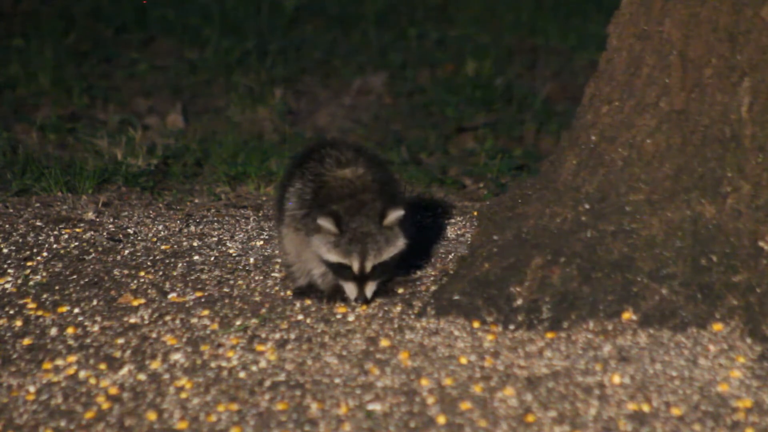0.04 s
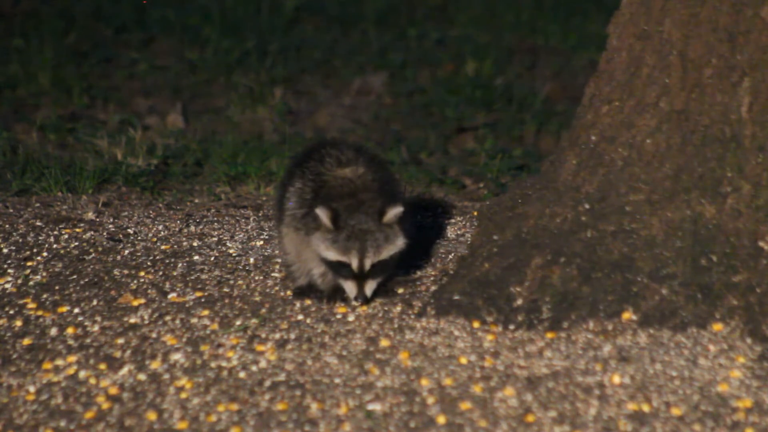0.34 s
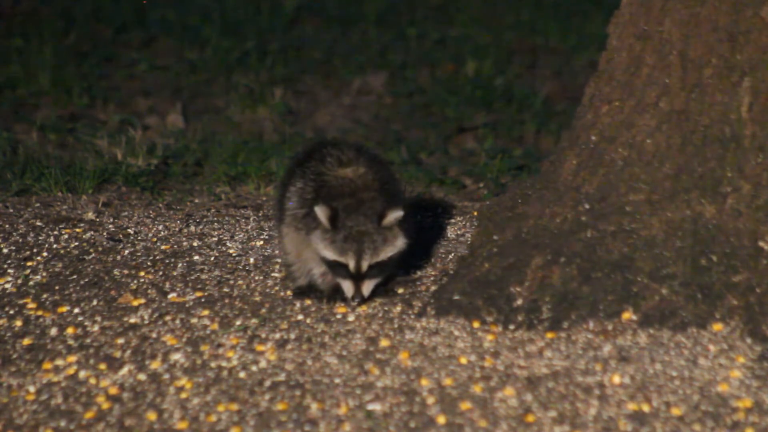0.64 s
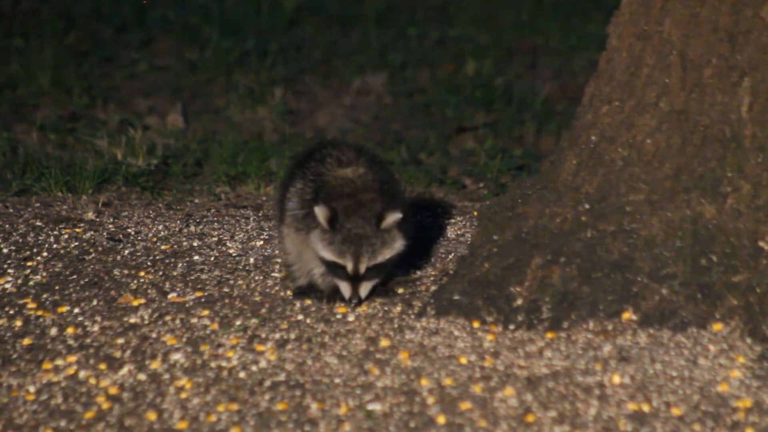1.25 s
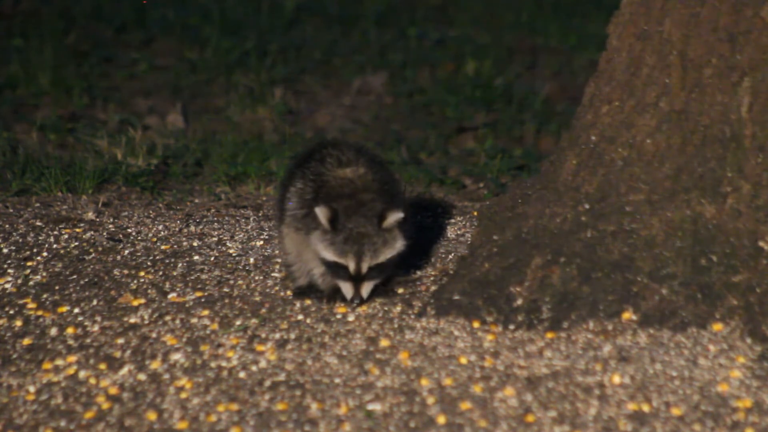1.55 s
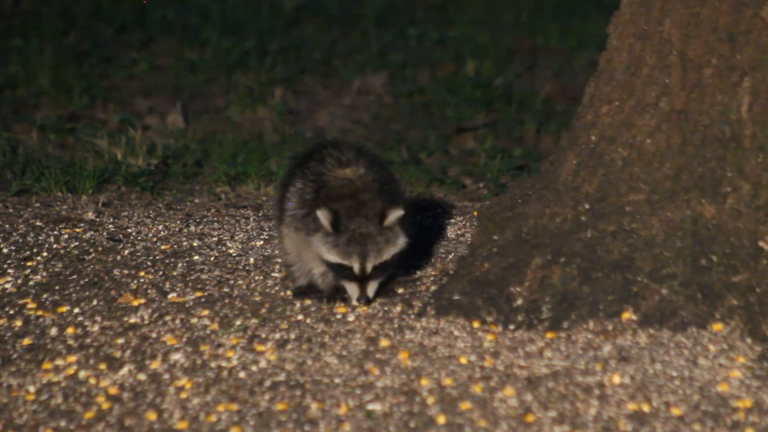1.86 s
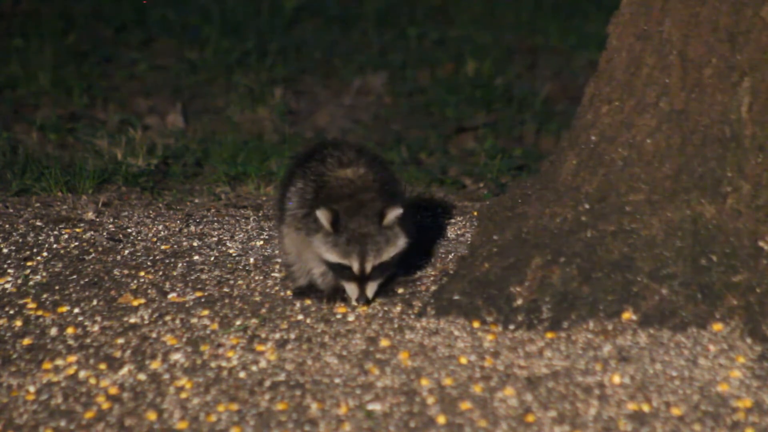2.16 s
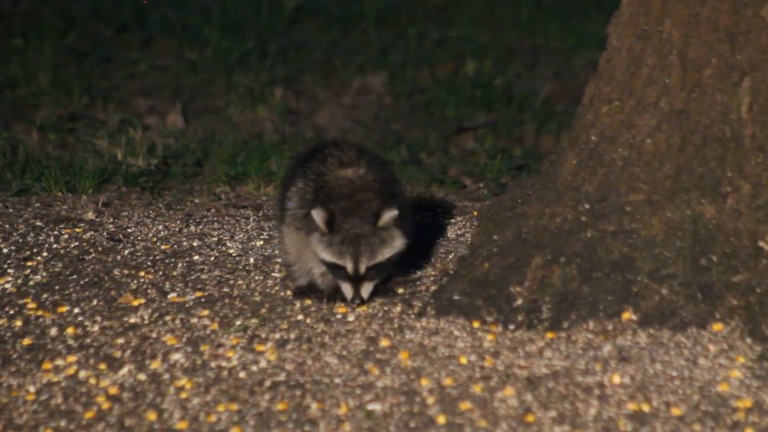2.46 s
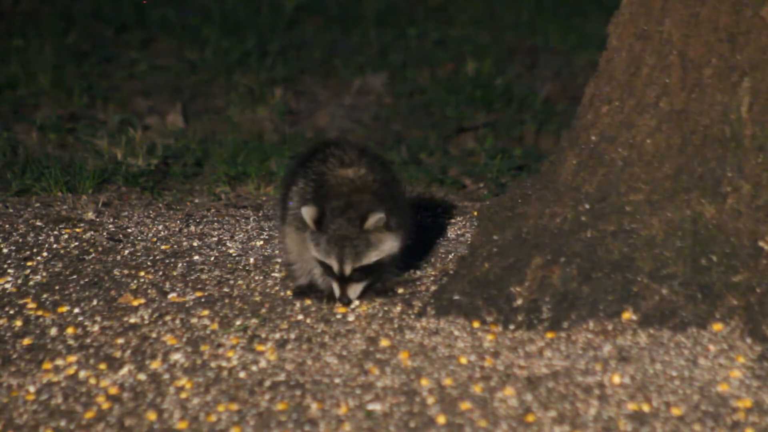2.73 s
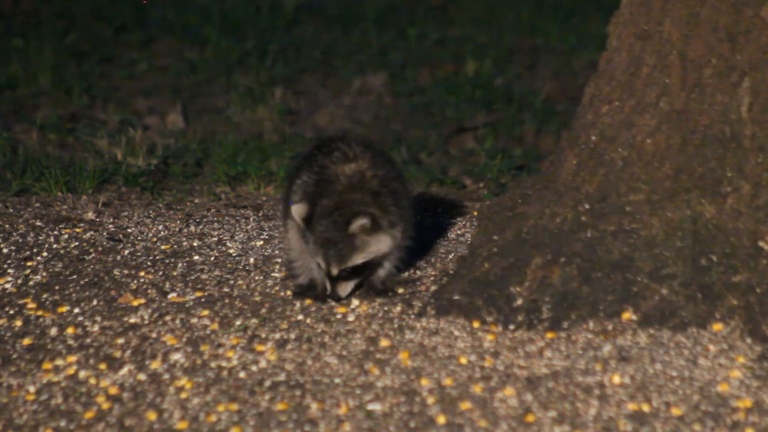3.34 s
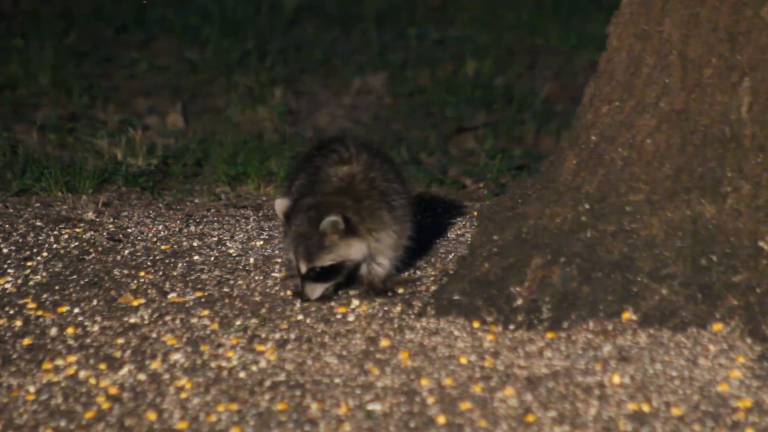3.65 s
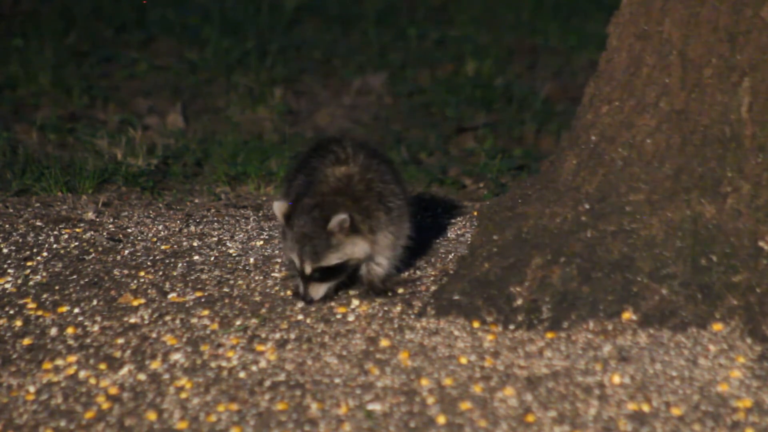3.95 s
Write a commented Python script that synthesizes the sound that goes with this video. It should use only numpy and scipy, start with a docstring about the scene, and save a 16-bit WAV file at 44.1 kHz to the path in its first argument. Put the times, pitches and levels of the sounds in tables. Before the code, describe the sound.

A close cricket trills in shrill, broken bursts from the start and stops at about 2.7 seconds. A softer, higher cricket chirps three or four times a second throughout, over a steady far insect chorus with a few faint rasps. A distant bird gives faint falling whistles at the start, from 2 to 2.7 seconds and from 3.2 to 3.9. Far machinery hums quietly under a low outdoor rumble.

```python
"""A near cricket trills in broken bursts, then stops: evening at the edge of a wood, in mono.
Each stroke of its wings is a tone that snaps on and falls as the scraper slows.
A small high cricket chirps steadily over a dense chorus of far ones. A distant bird whistles
falling notes, scattered by trunks and leaves, and a few raspy calls die away.
Underneath, far machinery hums in the rumble of the air."""
import sys
import numpy as np
from scipy import signal
from scipy.fft import rfft, irfft
from scipy.io import wavfile

SR = 44100
rng = np.random.default_rng(int(sys.argv[2]) if len(sys.argv) > 2 else 0)


def wav_record(signal):
    """Record a signal, one row per channel, as 16-bit PCM in the file named by sys.argv[1]."""
    frames = np.transpose(np.atleast_2d(signal))
    bounded = np.clip(frames, -1, 1)
    # unit amplitude maps onto the largest positive 16-bit level
    quanta = np.round(bounded * 32767).astype(np.int16)
    wavfile.write(sys.argv[1], SR, quanta)


N = 176400
LEAD = SR // 2   # pre-roll, so the scene opens already sounding
TIME = np.arange(-LEAD, N) / SR

# tone colour of the open air, before its treble roll-off: frequency_hz, relative_db
AIR_SPECTRUM = [(20, -34), (31, -25), (42, -5.5), (56, -6), (70, -7), (88, -8.5), (100, -7), (115, 0),
                (130, -8), (175, -6.5), (195, -12), (235, -10), (290, -11), (400, -14.5), (640, -16.5),
                (1000, -20), (1250, -21), (1600, -32.5), (2300, -35.5), (3200, -26)]
# slow swell of the deep rumble: time_s, relative_db
RUMBLE_SWELL = [(0, -55), (.6, -51), (1.05, -53), (1.7, -46), (2.7, -45), (3.2, -47), (4, -55)]
# tones of the far machinery: pitch_hz, level_db, unsteadiness_0_to_1
HUM_TONES = [(90.6, -51.5, 0.14), (159, -46, 0.39), (214.5, -46, 0.2)]
# tone colour of the farthest insects: frequency_hz, relative_db
INSECT_WASH_SPECTRUM = [(2500, -18.5), (3100, -18.5), (3500, -11), (3850, -13), (4150, -16), (4550, -8),
                        (5200, -4.5), (5800, 1), (6250, -1), (6650, -10.5), (7300, -22), (7900, -17),
                        (8350, -21.5), (8700, -24.5), (9300, -33.5), (12000, -42.5), (15500, -51)]
# groups of far crickets: pitch_hz, spread_hz, strokes_per_s, level_db
CRICKET_CHOIRS = [(5900, 146, 55, -39.5), (4685, 78, 42, -41.5)]
# far raspy calls: start_s, centre_hz, width_hz, gain_db
RASPY_CALLS = [(-.02, 6870, 480, -36), (.705, 7560, 130, -45), (1.825, 6940, 380, -39),
               (3.36, 6700, 400, -36.5)]
# falling bird whistles: start_s, length_s, start_hz, end_hz, bend_exponent (1 is straight), level_db
BIRD_WHISTLES = [(-.08, 0.17, 3570, 3100, 1.8, -45), (.0, 0.049, 2800, 1700, 1.3, -42.5),
                 (2.02, 0.12, 3250, 2690, 1.5, -45), (2.188, .1, 2280, 1870, 1.3, -46),
                 (2.44, .105, 3990, 3190, 1.0, -40.5), (2.539, .115, 3130, 2360, 2.6, -42),
                 (3.174, 0.16, 3250, 2605, 2.25, -41.5), (3.355, .12, 2130, 1856, 1.22, -48),
                 (3.585, 0.056, 4050, 3410, 1.4, -42.5), (3.658, 0.12, 3200, 2305, 1.9, -40.5),
                 (3.825, 0.078, 2120, 1910, 1.66, -42.5)]
# chirps of the high cricket: first_pulse_s, last_pulse_s
HIGH_CHIRPS = [(.171, .249), (.452, .531), (.732, .821), (1.042, 1.121), (1.333, 1.410), (1.606, 1.686),
               (1.911, 2.001), (2.188, 2.266), (2.451, 2.518), (2.722, 2.801), (3.020, 3.098),
               (3.299, 3.376), (3.503, 3.582), (3.794, 3.873)]
# trill bursts of the near cricket: first_stroke_s, last_stroke_s
NEAR_BURSTS = [(.009, .108), (.140, .178), (.213, .290), (.342, .342), (.381, .381), (.4145, .670),
               (.706, .904), (.941, .982), (1.014, 1.136), (1.171, 1.210), (1.251, 1.290), (1.329, 1.388),
               (1.429, 1.467), (1.502, 1.598), (1.631, 1.729), (1.787, 1.827), (1.865, 1.962),
               (2.002, 2.041), (2.082, 2.122), (2.160, 2.200), (2.236, 2.293), (2.333, 2.371),
               (2.412, 2.412), (2.447, 2.486), (2.528, 2.569), (2.608, 2.649)]


def from_db(db):
    """Decibels to gain."""
    return 10 ** (np.asarray(db) / 20)


def unit_rms(x):
    """Scale to unit power."""
    return x / np.sqrt(np.mean(x ** 2) + 1e-20)


def noise(gain_at):
    """Unit-power noise coloured by a gain over frequency."""
    hz = np.maximum(np.fft.rfftfreq(len(TIME), 1 / SR), 1)
    white = rng.standard_normal(len(TIME))
    return unit_rms(irfft(rfft(white) * gain_at(hz), len(TIME)))


def noise_band(centre_hz, width_hz):
    """Unit-power noise in a bell-shaped band."""
    return noise(lambda hz: np.exp(-.5 * ((hz - centre_hz) / width_hz) ** 2))


def eq_curve(spectrum, hz):
    """Gain of a spectrum table at these frequencies."""
    points_hz, db = np.transpose(spectrum)
    return from_db(np.interp(np.log(hz), np.log(points_hz), db))


def drift(rate_hz):
    """Random modulation with a spread of 1, mostly slower than the rate."""
    return noise(lambda hz: 1 / (1 + (hz / rate_hz) ** 2))


def add(track, start_s, sound):
    """Lay a sound into a track."""
    i = max(int(start_s * SR) + LEAD, 0)
    part = track[i:i + len(sound)]
    part += sound[:len(part)]


def phase_of(hz):
    """Running phase of a gliding tone."""
    return 2 * np.pi * np.cumsum(hz) / SR


def pulse_times(first_s, last_s, gap_s):
    """Evenly spaced pulses from the first to the last, about one gap apart."""
    gaps = max(int(round((last_s - first_s) / gap_s)), 0)
    return np.linspace(first_s, last_s, gaps + 1)


def among_trees(dry, wet_db, t60_s=0.7, build_s=0.036):
    """The direct sound and its scatter from trunks and leaves."""
    t = np.arange(SR) / SR
    tail = rng.standard_normal(SR) * from_db(-60 * t / t60_s) * (1 - np.exp(-t / build_s))
    wet = signal.fftconvolve(dry, tail / np.linalg.norm(tail))[:len(dry)]
    return dry + from_db(wet_db) * wet


def open_air(rolloff_hz=2780):
    """A soft, dark bed of air over a deep rumble that swells and sinks."""
    bed = noise(lambda hz: eq_curve(AIR_SPECTRUM, hz) / (1 + (hz / rolloff_hz) ** 4))
    rumble = noise_band(centre_hz=55.4, width_hz=8.4)
    swell_db = np.interp(TIME, *np.transpose(RUMBLE_SWELL))
    return from_db(-43) * bed + from_db(swell_db - 0.5) * rumble


def machinery_hum():
    """Far machinery: low tones, each part steady and part wavering in level and phase."""
    out = np.zeros(len(TIME))
    for hz, db, unsteadiness in HUM_TONES:
        phase = 2 * np.pi * hz * TIME
        steady = np.sqrt(2 * max(1 - unsteadiness ** 2, 0)) * np.sin(phase)
        wavering = drift(7.6) * np.sin(phase) + drift(2.3) * np.cos(phase)
        out += from_db(db) * (steady + unsteadiness * wavering)
    return out


def insect_wash(level_db=-34, flicker_db=.5):
    """The farthest insects blur into one faintly flickering hiss."""
    gain = from_db(level_db + flicker_db * drift(23))
    return gain * noise(lambda hz: eq_curve(INSECT_WASH_SPECTRUM, hz))


def wing_stroke(hz, sag_hz_per_s, rise_s, fall_s, overtone_db, snap=2.6):
    """One closing of the wings, centred in 20 ms: a tone snaps on and falls as the scraper slows."""
    t = np.arange(-SR // 100, SR // 100) / SR
    envelope = np.exp(-np.where(t < 0, np.abs(t / rise_s) ** snap, (t / fall_s) ** 2))
    phase = phase_of(hz - sag_hz_per_s * t)
    return envelope * (np.sin(phase) + from_db(overtone_db) * np.sin(2 * phase))


def far_crickets(per_choir=6):
    """Choirs of far crickets trill without pause, each insect at its own pitch and pace."""
    out = np.zeros(len(TIME))
    for pitch_hz, spread_hz, strokes_per_s, db in CRICKET_CHOIRS:
        choir = np.zeros(len(TIME))
        for hz in pitch_hz + spread_hz * np.linspace(-1, 1, per_choir):
            stroke = wing_stroke(hz, sag_hz_per_s=45900, rise_s=.0028, fall_s=.0028, overtone_db=-40)
            own_gap_s = rng.uniform(.8, 1.2) / strokes_per_s
            gaps_s = own_gap_s * (1 + .04 * rng.standard_normal(400))
            for start_s in TIME[0] + np.cumsum(gaps_s):
                add(choir, start_s, stroke)
        out += from_db(db) * unit_rms(among_trees(choir, wet_db=-2))
    return out


def raspy_calls(rise_s=0.0083, decay_s=0.13):
    """Far hoarse calls: narrow bands of noise with a quick attack and a fading tail."""
    out = np.zeros(len(TIME))
    for start_s, centre_hz, width_hz, db in RASPY_CALLS:
        age_s = np.maximum(TIME - start_s, 0)
        envelope = (1 - np.exp(-age_s / rise_s)) * np.exp(-age_s / decay_s)
        out += from_db(db) * envelope * noise_band(centre_hz, width_hz)
    return out


def distant_bird(waver_hz=41, flicker_db=2.5):
    """Pure, slightly wavering whistles; most drop quickly and level off."""
    out = np.zeros(len(TIME))
    for start_s, length_s, start_hz, end_hz, bend, db in BIRD_WHISTLES:
        progress = np.linspace(0, 1, int(length_s * SR))
        glide_hz = end_hz + (start_hz - end_hz) * (1 - progress) ** bend
        tone = np.sin(phase_of(glide_hz + waver_hz * drift(42)[:len(progress)]))
        envelope = np.abs(np.sin(np.pi * progress)) ** .5
        add(out, start_s, from_db(db) * envelope * tone)
    flicker = from_db(flicker_db * drift(27))
    return among_trees(out * flicker, wet_db=-3)


def high_cricket(pitch_hz=8418, scoop_hz=350, pulse_s=.0095, level_db=-37.5, soft_start_db=-11):
    """Short chirps that open softly; each pulse scoops up to pitch, then droops as it fades."""
    out = np.zeros(len(TIME))
    progress = np.linspace(0, 1, int(pulse_s * SR))
    envelope = np.sin(np.pi * progress)
    scooped_hz = pitch_hz - scoop_hz * (1 - progress) ** 4
    for first_s, last_s in HIGH_CHIRPS:
        times = pulse_times(first_s, last_s, gap_s=.0113)
        droops_hz = np.linspace(400, 1700, len(times))   # each pulse droops further than the last
        for k, droop_hz in enumerate(droops_hz):
            hz = scooped_hz + rng.normal(0, 25) - droop_hz * progress ** 3
            db = level_db + soft_start_db * (k == 0) + rng.normal(0, 1)
            add(out, times[k] - .4 * pulse_s, from_db(db) * envelope * np.sin(phase_of(hz)))
    return among_trees(out, wet_db=-10)


def near_cricket(pitch_hz=5113, level_db=-20.5, echo_s=.00946, echo_db=-8):
    """Bursts of nearly equal wing strokes, with one echo from a near trunk."""
    out = np.zeros(len(TIME))
    for first_s, last_s in NEAR_BURSTS:
        for centre_s in pulse_times(first_s, last_s, gap_s=.0196):
            hz = pitch_hz + rng.normal(0, 23.3)
            stretch = np.exp(rng.normal(0, 0.061))   # a longer stroke sags more slowly
            stroke = wing_stroke(hz, sag_hz_per_s=62000 / stretch, rise_s=.0027,
                                 fall_s=.004 * stretch, overtone_db=-37)
            gain = from_db(level_db + rng.normal(0, 0.25))
            add(out, centre_s - len(stroke) / SR / 2, gain * stroke)
    echo = from_db(echo_db) * np.interp(TIME - echo_s, TIME, out)
    return among_trees(out + echo, wet_db=-16)


def scene():
    """All layers at one microphone, alike in both channels."""
    foreground = near_cricket() + high_cricket()
    distance = insect_wash() + far_crickets() + distant_bird() + raspy_calls()
    bed = open_air() + machinery_hum()
    mono = foreground + distance + bed
    return np.tile(mono[LEAD:], (2, 1))


def record(dry, stopband_hz=16000):
    """A steep low-pass takes off the very top."""
    return signal.sosfilt(signal.cheby2(16, 60, stopband_hz, fs=SR, output="sos"), dry)


dry = scene()
out = record(dry)
wav_record(out)
```